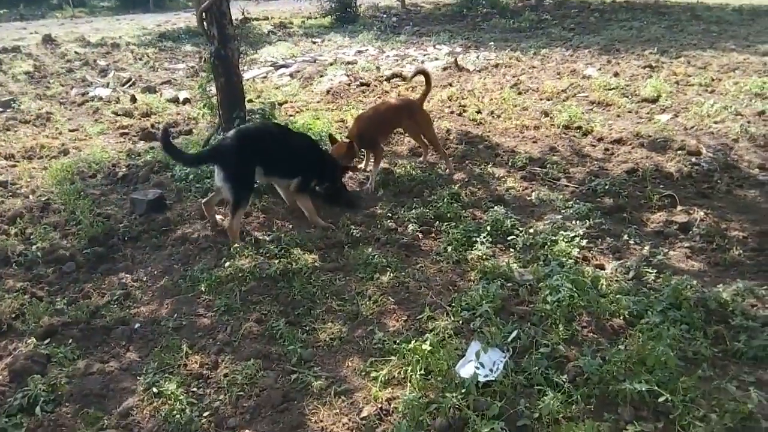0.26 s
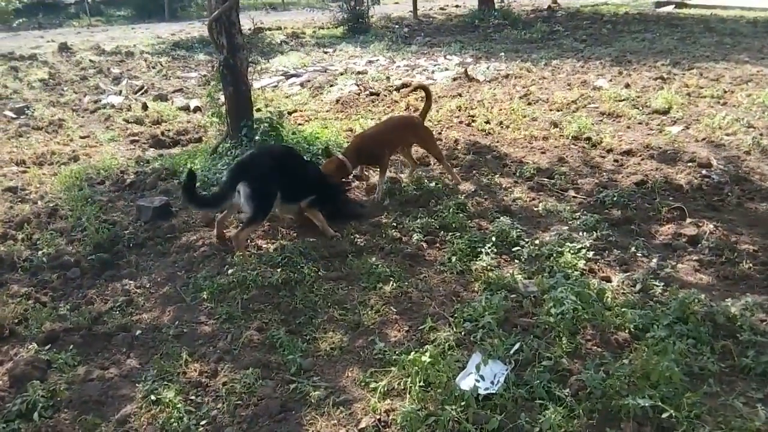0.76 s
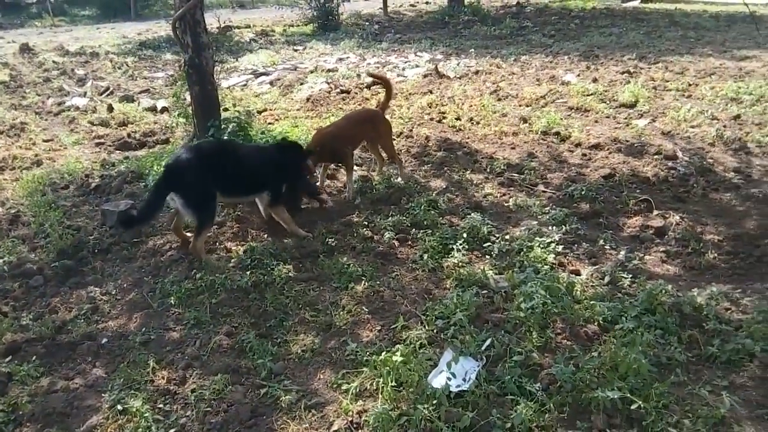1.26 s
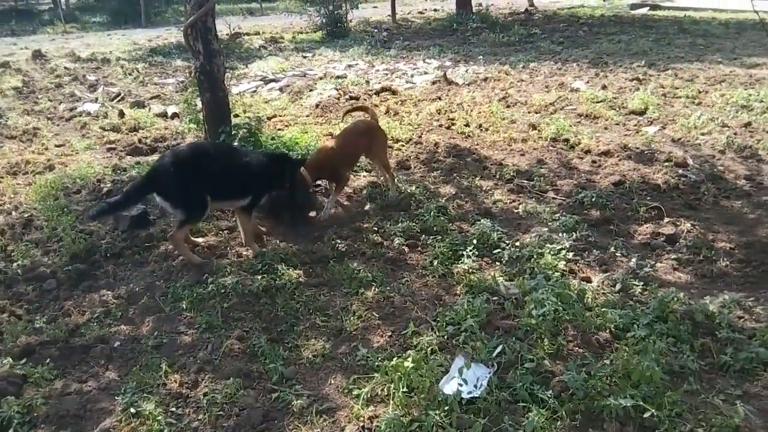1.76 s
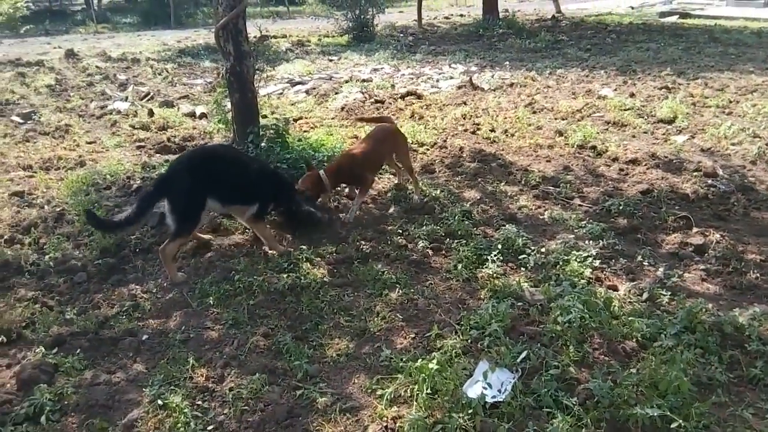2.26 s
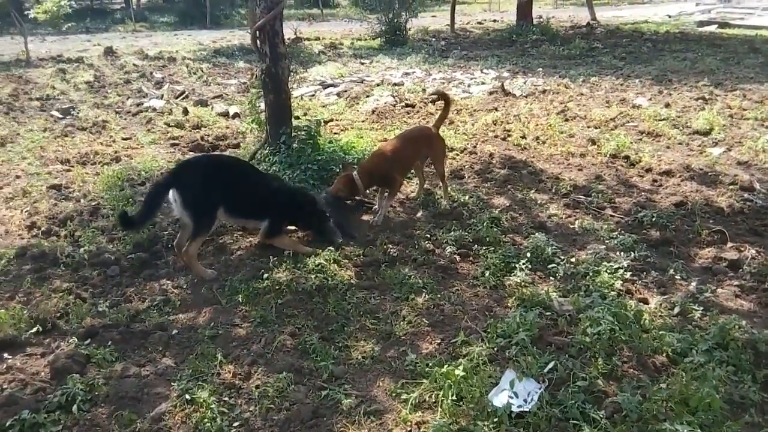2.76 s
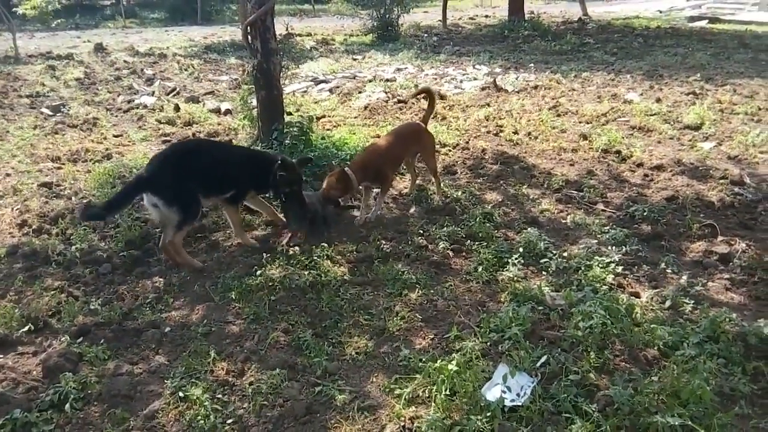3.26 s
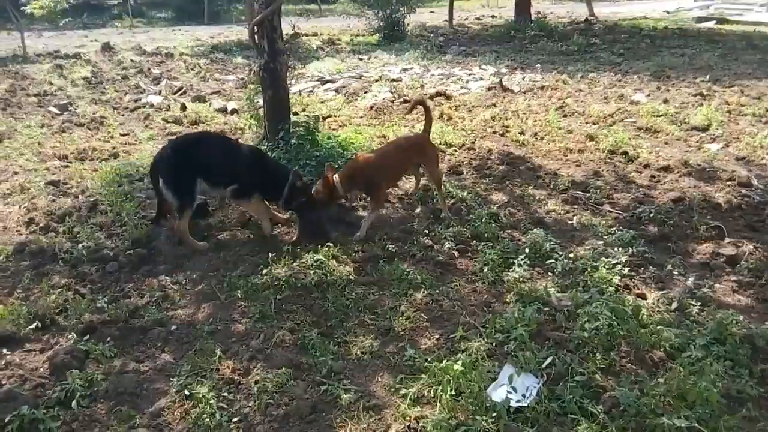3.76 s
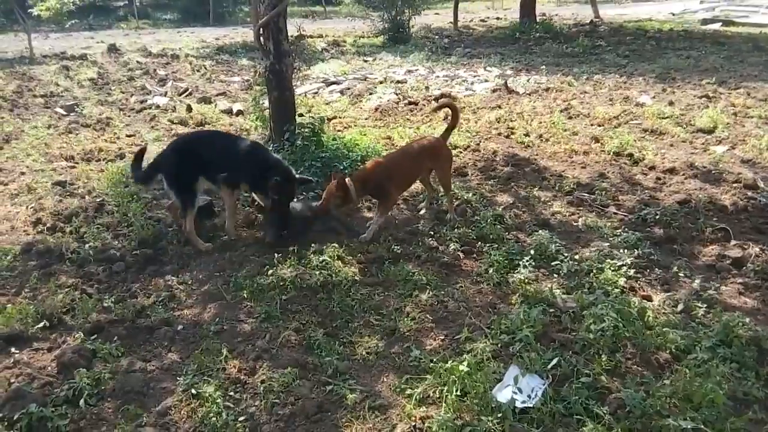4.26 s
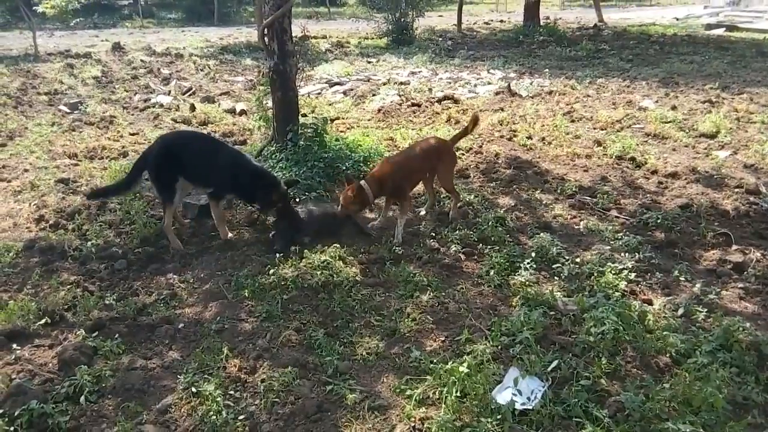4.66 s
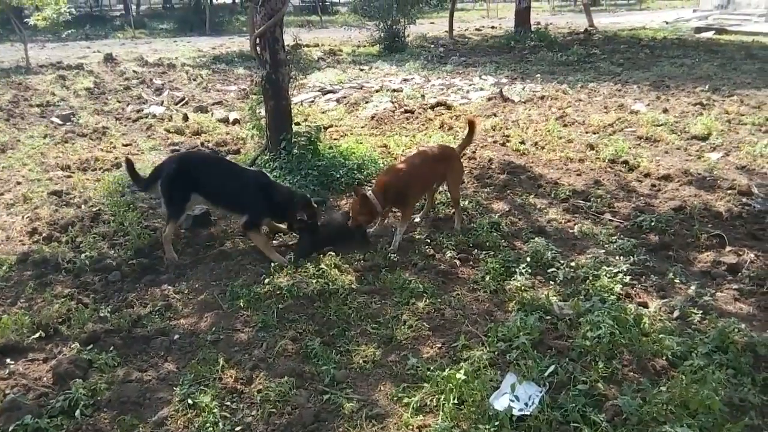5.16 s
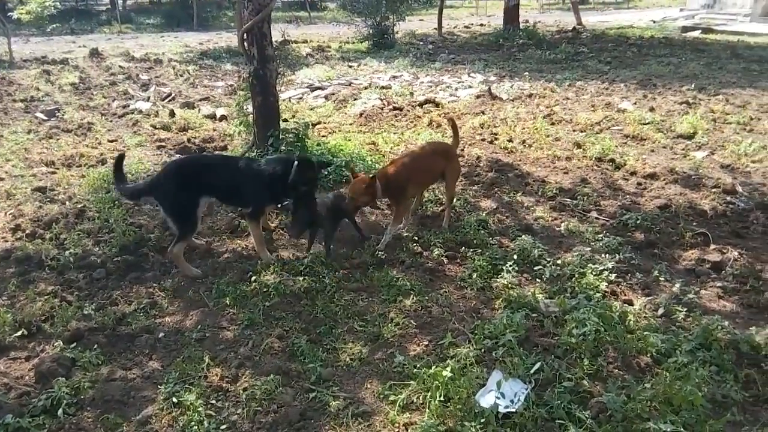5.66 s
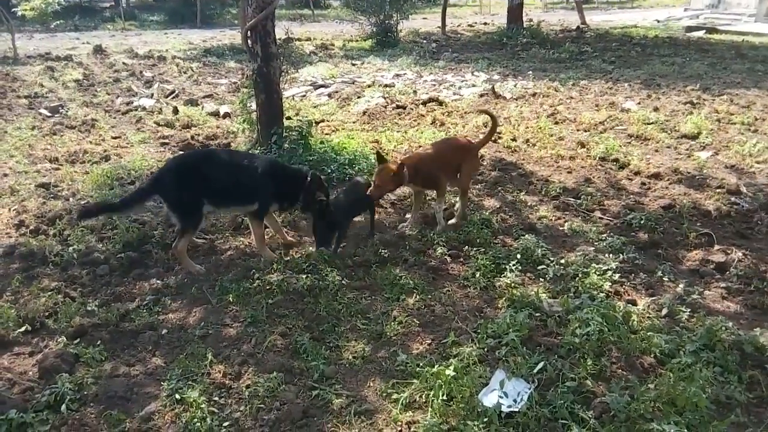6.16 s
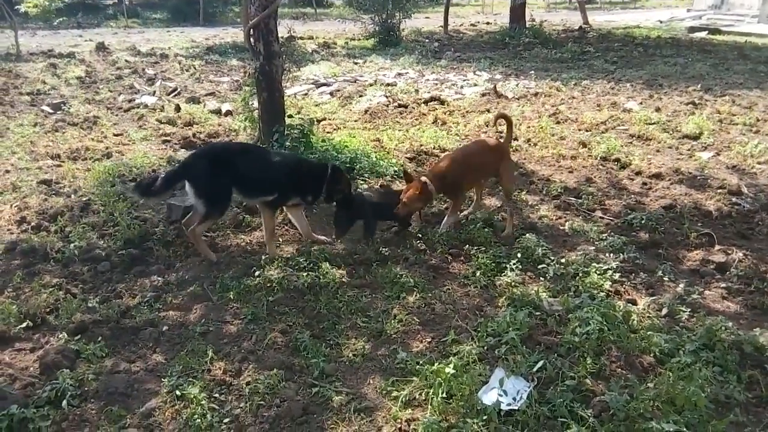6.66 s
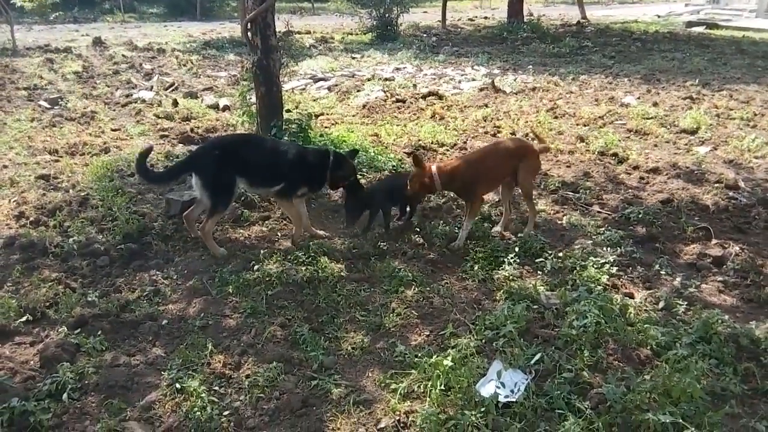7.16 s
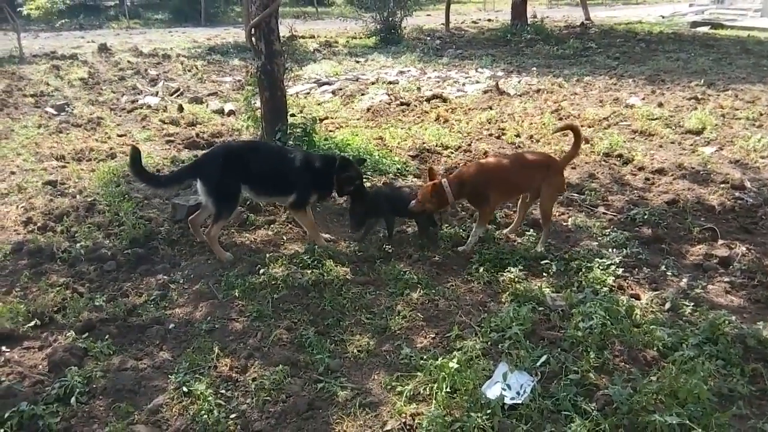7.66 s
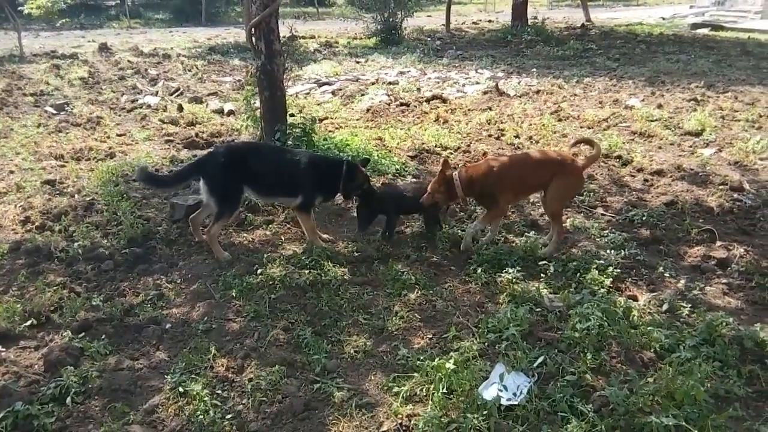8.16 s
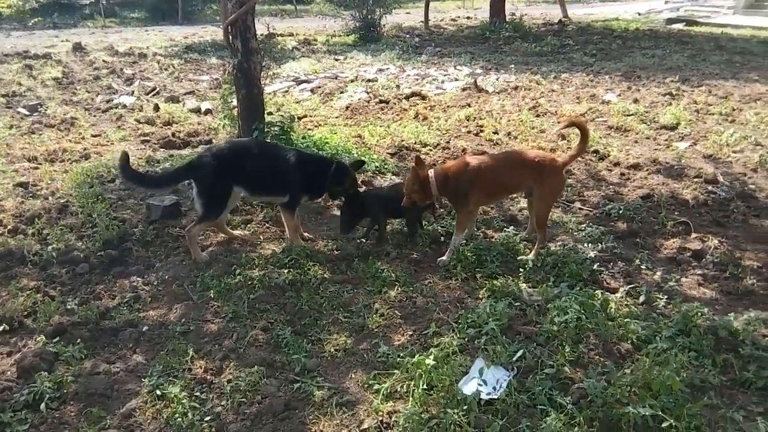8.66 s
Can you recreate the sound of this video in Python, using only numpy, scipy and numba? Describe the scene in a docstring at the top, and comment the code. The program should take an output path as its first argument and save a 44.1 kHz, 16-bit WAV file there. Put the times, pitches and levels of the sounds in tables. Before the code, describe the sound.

Quiet outdoor air with a barely audible low motor hum lies under a piglet screaming a few metres from a phone. The end of a squeal drops away at 0-0.1 s. A low croak rattles at 0.6, a faint leaf snap comes near 0.9, then a short squeal at 1.0-1.1 over soft soil thuds. The longest, loudest scream runs 1.45-2.6, nasal and whistling, breaking between clear and hoarse and jumping up in pitch. Another long one, 3.0-3.9, starts rough, leaps higher, then sinks; a leaf snaps sharply inside it near 3.45. Shorter cries follow: 4.35-4.7 with a croak inside, 5.2-5.85 growing out of a croak, a quick one at 6.3-6.5, and a weaker one at 7.0-7.5 after a croak. Faint leaf crackles come near 7.8, croaks at 8.05 and 8.6, and a last short squeal at 8.65-8.85. Each ends abruptly with a thin, dull echo.

```python
"""A piglet held by two dogs screams on open ground under trees, a few metres from a phone.
Over a quiet outdoor background and motor hum, the end of one cry drops away; then come eight more, made by
tone and hiss of the folds in moving resonances: squeals that flip between clear and hoarse and fall in pitch.
Before or in many of them slack folds croak, as rows of slaps that ring the airway. From just before the
second cry, paws now and then snap dry leaves; soft thuds on soil, as low decaying sines, lie under that cry."""
import sys
import numpy as np
from scipy import signal
from scipy.fft import rfft, irfft, next_fast_len
from scipy.io import wavfile
from scipy.ndimage import uniform_filter1d
from numba import njit

SR = 44100
rng = np.random.default_rng(int(sys.argv[2]) if len(sys.argv) > 2 else 0)


def file_out(sig):
    """Save sig as 16-bit WAV at sys.argv[1]."""
    # one column per channel
    cols = np.atleast_2d(sig).T
    # limit, then scale
    lim = np.clip(cols, -1, 1)
    pcm = np.round(lim * 32767).astype(np.int16)
    wavfile.write(sys.argv[1], SR, pcm)


N = 392490
TIME = np.arange(N) / SR


def undb(db):
    """Decibels to gain."""
    return 10 ** (np.asarray(db) / 20)


def unit(x):
    """Scale to rms 1."""
    return x / np.sqrt(np.mean(x ** 2))


def steady(x, span_s):
    """Hold the short-term rms near 1; faster flutter stays."""
    size = max(int(span_s * SR), 8)
    power = uniform_filter1d(uniform_filter1d(x * x, size), size)
    return x / np.sqrt(np.abs(power) + 1e-12)


def colour(x, points):
    """Filter by a (Hz, dB) outline, joined on a logarithmic frequency scale."""
    hz, db = np.transpose(points)
    size = next_fast_len(N, real=True)
    bins_hz = np.maximum(np.arange(size // 2 + 1) * SR / size, 1)
    gain = undb(np.interp(np.log(bins_hz), np.log(hz), db))
    return irfft(rfft(x, size) * gain, size)[:N]


def wobble(rate):
    """Random motion of rms 1, gliding between `rate` chance values per second."""
    knots = rng.standard_normal(int(N / SR * rate) + 2)
    return unit(np.interp(TIME * rate, np.arange(len(knots)), knots))


def turn(hz):
    """Running phase in radians of a changing frequency."""
    return 2 * np.pi * np.cumsum(hz) / SR


def add(out, s, sound):
    """Mix a short sound in at time s."""
    i = max(int(s * SR), 0)
    out[i:i + len(sound)] += sound[:N - i]


def along(t, curve):
    """Read each column of an (s, ..) curve at the times t."""
    s, *columns = np.transpose(curve)
    return [np.interp(t, s, c) for c in columns]


# Colour of the outdoor air. Each row: frequency in Hz, relative density in dB per Hz.
AIR_COLOUR = [(25, -15), (60, -0.5), (115, 5), (200, -3.5), (400, -7), (520, 3.5), (640, -6), (850, -3),
              (1400, -6), (2800, -10), (4200, -9), (6500, -12.5), (10000, -26), (15500, -16.5)]


def outdoors(air_db=-53, hum_hz=122, hum_db=-67):
    """Coloured noise swells very faintly; a distant motor hum is one sine of unsteady pitch and level."""
    air = unit(colour(rng.standard_normal(N), AIR_COLOUR)) * undb(air_db + 0.23 * wobble(1.0))
    hum = np.sin(turn(hum_hz * (1 + 0.02005 * wobble(9.5))))
    return air + hum * undb(hum_db + 2.8 * wobble(8.4))


SCOOP_S = .035  # time constant of the upward scoop in pitch
# on letting go the folds slacken and the pitch drops
FALL_HZ_PER_S, LOWEST_HZ, SLACKEN_S = 2600, 149.54, .022
RELEASE_DB_PER_S = 446  # a cry dies away after the last point of its airway curve
JAW_CLOSES = .9  # the main resonance sinks by this share of the relative pitch fall
USUAL_ROUGH, USUAL_SNOUT_DB = 0.37, -28.5  # where the throat, mouth and lip levels of a cry apply
THROAT_ROUGH_DB, MOUTH_ROUGH_DB = 9, 8.5  # rise per unit of roughness
THROAT_SLACK_DB = 7.5  # rise in the throat with fully slack folds
MOUTH_FOLLOWS, LIPS_FOLLOW = 0.62, 0.89  # dB per dB of the snout


def cry(t, row, fold_curve, airway_curve):
    """Controls of one cry: the pitch scoops, is held, then drops as the folds let go, and the airway dies away."""
    (start, attack, lets_go, scoop_hz, fall_rough, skirt_db, mouth_db,
     throat_start, throat_end, lips_start, lips_end) = row
    held_hz, rough = along(t, fold_curve)
    main, snout, jaw_hz = along(t, airway_curve)
    throat, lips = along(t, [(start, throat_start, lips_start), (lets_go, throat_end, lips_end)])
    age = t - start
    falling = np.maximum(t - lets_go, 0)
    dying = np.maximum(t - airway_curve[-1][0], 0)
    slack = np.minimum(falling / SLACKEN_S, 1)

    scooped_hz = held_hz - scoop_hz * np.exp(-age / SCOOP_S)
    hz = np.maximum(scooped_hz - FALL_HZ_PER_S * falling, LOWEST_HZ)
    jaw_hz = jaw_hz * np.maximum(1 - JAW_CLOSES * FALL_HZ_PER_S * dying / held_hz, .5)
    rough = np.clip(rough + slack * (fall_rough - rough), 0, 1)

    # hoarse or slack folds feed the throat, rasp fills the mouth
    rasp = rough - USUAL_ROUGH
    brightness = snout - USUAL_SNOUT_DB
    throat = throat + THROAT_ROUGH_DB * rasp + THROAT_SLACK_DB * slack
    mouth = mouth_db + MOUTH_FOLLOWS * brightness + MOUTH_ROUGH_DB * rasp
    lips = lips + LIPS_FOLLOW * brightness
    sounding = np.minimum(age / attack, 1) * undb(-RELEASE_DB_PER_S * dying)
    return np.array([hz, rough, jaw_hz, sounding, main, main + skirt_db, throat, mouth, snout, lips])


def folds(hz, rough, jitter=0.0198, waver=0.01302, tear=0.73, high_tear=1.9, bend_hz=110, patchy_db=9.0,
          gating=.7, side=0.37, side_ratio=0.25, chaos=2.09, air=0.0097, count=15):
    """Tone and noise of the folds; under strain the harmonics waver, tear apart and drown in turbulence."""
    drift = rough * (jitter * wobble(300) + waver * wobble(36)) + 0.002094 * wobble(60)
    phase = turn(hz * (1 + drift))
    tone = 0
    for k in range(1, count + 1):
        # each harmonic swells, slips and bends on its own, the high ones most
        height = 2 * k / count
        swell = undb(patchy_db * np.sqrt(rough) * height * np.tanh(wobble(30)))
        bend = turn(bend_hz * rough * height ** 2 * wobble(22))
        slip = tear * rough * (1 + high_tear * height ** 2) * wobble(110)
        tone = tone + swell * np.cos(k * phase + bend + slip)
    # a second, slower oscillation of the larynx puts sidebands between the harmonics
    flap = np.cos(turn(side_ratio * hz * (1 + 0.18 * wobble(14))))
    tone = unit(tone * (1 + 2 * side * rough * flap))
    # the air rushes in step with the folds
    turbulence = unit(rng.standard_normal(N) * (1 + gating * np.cos(phase)))
    # the highest part of the voice always has hiss
    hiss = colour(turbulence, [(4000, -37.0), (6300, -19), (8000, 0.5)])
    noise = (air + chaos * rough ** 1.34) * turbulence + hiss
    return (1 - rough ** 2) * tone, noise


@njit
def resonate(x, hz, width):
    """State-variable band-pass with a moving centre and width, both in Hz."""
    y, band, low = np.empty(len(x)), 0., 0.
    for i in range(len(x)):
        g, k = np.tan(np.pi * hz[i] / SR), width[i] / hz[i]
        v = (band + g * (x[i] - low)) / (1 + g * (g + k))
        band, low, y[i] = 2 * v - band, low + 2 * g * v, k * v
    return y


# The cries. Each row: start in s, attack in s, moment of letting go in s, upward scoop in Hz,
# roughness of the final fall from 0 to 1, skirt relative to the untrimmed main resonance in dB, mouth in dB,
# throat at the start in dB, throat on letting go in dB, lips at the start in dB, lips on letting go in dB.
# Throat, mouth and lip levels shift with roughness, slackness and the snout.
CRIES = [(-.05, .01, 0.068, -1, 0.21, -10, -37.5, -58, -45, -49, -44),
         (1.025, .018, 1.12, 70, .35, -6.5, -34.5, -35, -48, -42, -38),
         (1.443, .01, 2.59, 130, 0.31, -16.5, -35.5, -48.5, -48.5, -35.5, -34),
         (3.033, .01, 3.875, 20, 0.57, -9.5, -34.5, -46.5, -50, -40.5, -48.5),
         (4.335, 0.0039, 4.69, 0, 0.41, -6.5, -35.5, -30.5, -47, -30, -39.5),
         (5.2, 0.062, 5.825, -0.5, 0.4, -10, -33, -32, -47.5, -26, -41.5),
         (6.28, .03, 6.45, 79.5, .55, -8.5, -32, -47, -46.5, -42, -38.5),
         (7.035, .02, 7.53, 100.5, 0.75, -8, -30.5, -53, -48.5, -31, -38),
         (8.645, 0.0086, 8.84, 48.5, 0.67, -9, -32, -41, -50.5, -25, -34.5)]
# Vocal folds, one curve per cry until it lets go. Each row: time in s, held pitch in Hz before scoop and
# jitter, roughness from 0 to 1.
FOLD_CURVES = [
    [(0, 368, 0.28), (.055, 309.5, 0.5)],
    [(1.03, 369, .7), (1.07, 383.4, 0.26), (1.095, 372.5, 0.19), (1.125, 345, 0.23)],
    [(1.45, 463, 0.63), (1.66, 477.7, 0.51), (1.77, 461.5, 0.56), (1.82, 451, 0.71), (1.88, 443, .5),
     (1.884, 529, 0.42), (1.98, 510, .3), (2.02, 533, .1), (2.06, 518, 0.45), (2.12, 511, .37),
     (2.3, 447, 0.77), (2.34, 494.4, 0.51), (2.39, 511, 0.21), (2.47, 507, 0.21), (2.58, 468.7, 0.58)],
    [(3.04, 414.4, 0.83), (3.09, 420.6, 0.72), (3.13, 440.7, 0.46), (3.28, 474.7, 0.36), (3.378, 473, 0.51),
     (3.382, 577, 0.56), (3.45, 560.3, 0.5), (3.53, 555.5, 0.39), (3.56, 544.3, 0.09), (3.66, 530, 0.17),
     (3.7, 541, 0.59), (3.74, 516.7, 0.18), (3.8, 508.4, 0.19), (3.875, 487.4, 0.37)],
    [(4.34, 458, 0.18), (4.41, 417.6, 0.93), (4.48, 484, 0.14), (4.53, 514.5, 0.29), (4.625, 528, 0.48),
     (4.65, 491, 0.14), (4.7, 484.7, 0.09)],
    [(5.21, 417.3, .35), (5.3, 429.4, 0.76), (5.33, 475, 0.36), (5.38, 493, .12), (5.46, 468, 0.5),
     (5.505, 487.7, .1), (5.54, 463.5, 0.23), (5.65, 547, 0.34), (5.77, 565, 0.3), (5.82, 508, 0.53)],
    [(6.29, 496.7, 1), (6.325, 496, 0.25), (6.345, 538, .6), (6.41, 509, 0.27), (6.435, 480.6, 0.06),
     (6.48, 457.2, 0.11)],
    [(7.04, 501, 0.7), (7.085, 533, 0.3), (7.13, 542, 0.24), (7.175, 434.6, .2), (7.22, 467, 0.57),
     (7.275, 426, 0.05), (7.36, 486, 0.64), (7.45, 486.7, 0.21), (7.51, 471, 0.36)],
    [(8.645, 485.6, 0.44), (8.74, 524, 0.38), (8.77, 497, 0.7)],
]
# Airway, one curve per cry. Each row: time in s, main resonance in dB before its trim, snout resonance in dB,
# main resonance set by the jaw in Hz before the voice pulls it.
AIRWAY_CURVES = [
    [(0.0, -30.5, -22, 2150), (0.04, -32.5, -32, 1850), (0.08, -45.5, -52, 1700)],
    [(1.03, -43, -62, 2170), (1.046, -32, -43, 2140), (1.08, -36, -30, 2120), (1.12, -23, -36, 2130),
     (1.155, -37, -49.5, 1630)],
    [(1.45, -35, -57, 1640), (1.482, -24.5, -30, 1750), (1.562, -23.5, -26, 2260),
     (1.582, -19.5, -22.5, 2292), (1.662, -24, -29.5, 2269), (1.766, -16.5, -26, 2296),
     (1.856, -23, -38.5, 2260), (1.912, -18.5, -25.5, 2130), (1.936, -17.5, -30.5, 2130),
     (2.118, -17.5, -29.5, 2120), (2.176, -27.5, -24.5, 1970), (2.26, -20.5, -22.5, 2330),
     (2.366, -31, -33, 2059), (2.398, -15, -31, 2040), (2.502, -19.5, -23.5, 1993),
     (2.58, -32.5, -23.5, 2015), (2.61, -26.5, -26, 1846)],
    [(3.04, -34, -41, 2123), (3.058, -33, -43.5, 2160), (3.104, -28.5, -36, 2200),
     (3.134, -29.5, -29, 1804), (3.212, -18, -23, 1822), (3.256, -28.5, -29.5, 1852),
     (3.346, -25, -35, 2401), (3.422, -20.5, -21, 2047), (3.494, -21, -20.5, 1830),
     (3.674, -20.5, -18, 2050), (3.77, -18, -20.5, 2010), (3.808, -21.5, -17.5, 1700),
     (3.832, -24.5, -20.5, 1562), (3.888, -24.5, -23.5, 1629), (3.9, -21.5, -26, 1646)],
    [(4.34, -35.5, -61, 2247), (4.46, -33.5, -28, 2225), (4.496, -38, -27.5, 1817), (4.608, -34, -45, 2140),
     (4.646, -25.5, -21.5, 1980), (4.682, -30.5, -17.5, 1917), (4.702, -36.5, -24.5, 1734),
     (4.722, -28.5, -26, 1912), (4.735, -34.5, -41.5, 2034)],
    [(5.21, -74, -83, 2070), (5.246, -70, -73, 2192), (5.29, -36.5, -53, 2027), (5.346, -31, -30.5, 2085),
     (5.4, -33.5, -33.5, 1870), (5.502, -25.5, -30, 2344), (5.536, -22.5, -24.5, 2307),
     (5.692, -26.5, -44.5, 2160), (5.73, -45.5, -59.5, 2225), (5.788, -24.5, -32, 1809),
     (5.845, -29, -32.5, 1670)],
    [(6.275, -38.5, -38, 1650), (6.427, -23.5, -27.5, 2390), (6.441, -25.5, -25.5, 2370),
     (6.481, -21, -22, 2305), (6.51, -32.5, -37, 2180)],
    [(7.045, -37, -52, 2243), (7.075, -39, -44, 1948), (7.181, -29.5, -36.5, 2183), (7.199, -37, -46, 2140),
     (7.283, -28.5, -35.5, 2220), (7.401, -33.5, -32.5, 2026), (7.429, -37.5, -27, 2326),
     (7.533, -29.5, -26.5, 2380), (7.555, -39, -43, 2390)],
    [(8.65, -34.5, -56, 2160), (8.69, -54, -57, 2210), (8.776, -31.5, -34.5, 2318), (8.8, -47, -52, 2232)],
]
# Fixed resonances of throat, mouth and snout, and the hiss at the lips.
# Each row: frequency in Hz, relative level in dB.
THROAT_SHAPE = [(190, -32), (300, -15), (420, -24), (560, -12), (720, -4), (880, 0), (1100, -6),
                (1300, -16), (1800, -60)]
MOUTH_SHAPE = [(2200, -75), (2750, 15.5), (3300, 17), (3600, 15), (4100, -105.5)]
SNOUT_SHAPE = [(3200, -75), (3700, -3.5), (4050, 10), (4400, -3.5), (4700, -7), (5200, -36.5)]
LIPS_SHAPE = [(4300, -49), (4800, 11), (5500, 9), (6600, 4.5), (7500, -8.5), (10000, -15), (15500, -17)]


def squeals(clear_width_hz=320, hoarse_width_hz=600, lock=0.057, main_trim_db=-1, grit_db=2, upper_tone=0.83):
    """The folds drive the airway; its main resonance moves with the jaw and lifts one harmonic to a whistle."""
    # each cry owns the time until the next one starts
    spans = np.split(TIME, np.searchsorted(TIME, [row[0] for row in CRIES[1:]]))
    controls = [cry(*each) for each in zip(spans, CRIES, FOLD_CURVES, AIRWAY_CURVES)]
    (hz, rough, jaw_hz, sounding, main_db, skirt_db,
     throat_db, mouth_db, snout_db, lips_db) = np.hstack(controls)
    tone, noise = folds(hz, rough)
    source = tone + noise
    # the whistle stays clearer than the rest of the voice
    whistle = tone + noise / 3
    # a harmonic near the resonance pulls it in; halfway between two, both sound
    centre_hz = jaw_hz - lock * hz * np.sin(2 * np.pi * jaw_hz / hz) / (2 * np.pi)
    # folds that no longer close damp the resonance
    width_hz = clear_width_hz + hoarse_width_hz * rough ** 2
    narrowed = resonate(whistle, centre_hz, width_hz)
    main = steady(resonate(narrowed, centre_hz, width_hz), 0.027)
    # a skirt below the main resonance lifts a second, lower harmonic
    skirt_shape = [(950, -13), (1300, 15), (1600, 23), (1800, 17), (2500, -56.0), (3100, -25.0)]
    skirt = steady(colour(source, skirt_shape), 0.028)
    voice = undb(main_db + main_trim_db) * main + undb(skirt_db) * skirt
    # mouth and lips get less tone for the same noise, so they sound hoarser
    breathy = upper_tone * tone + noise
    for drive, shape, db in ((source, THROAT_SHAPE, throat_db), (breathy, MOUTH_SHAPE, mouth_db),
                             (source, SNOUT_SHAPE, snout_db), (breathy, LIPS_SHAPE, lips_db)):
        voice += undb(db) * steady(colour(drive, shape), 0.05)
    # hoarse stretches come in uneven bursts
    grit = undb(grit_db * rough ** 2 * np.tanh(wobble(170)))
    return voice * sounding * grit


# The croaks. Each row: first slap in s, last slap in s, average slaps per s before rounding to whole slaps,
# bunching towards the end from 0 to 1, loudest moment in s, level there in dB before the croak trim.
CROAKS = [(.569, 0.697, 63, 0.28, .625, -17.5), (4.367, 4.417, 61, 0, 4.4, -19.5),
          (5.236, 5.284, 87, 0.17, 5.265, -21.5), (6.217, 6.269, 56, 0, 6.246, -22.5),
          (6.922, 7.03, 55, .1, 6.982, -17.5), (8.019, 8.115, 48, 0, 8.032, -19),
          (8.543, 8.636, 55, 0.12, 8.584, -20.5)]


def slaps(swell_s=0.058, swell_db=10, scatter_db=1):
    """(s, dB) of every slap: within a croak they swell and fade, and mostly speed up."""
    out = []
    for first, last, rate, bunch, loudest, db in CROAKS:
        part = np.linspace(0, 1, round((last - first) * rate) + 1)
        s = first + (last - first) * (part + bunch * part * (1 - part))
        # swell_s away from its loudest moment a croak is swell_db weaker
        weaker_db = swell_db * (np.abs(s - loudest) / swell_s) ** 1.58
        out += zip(s, db - weaker_db + scatter_db * rng.standard_normal(len(s)))
    return out


# What a slap rings in the airway. Each row: frequency in Hz before a chance shift, time to fall 60 dB in s,
# relative level in dB before hardness and the croak colour.
CROAK_MODES = [(285.7, 0.0075, -42), (931, 0.032, -5), (1550, 0.026, -20), (2340, 0.021, 0.5),
               (3240, 0.0042, 8.5), (3845, 0.024, -0.5), (5500, 0.0078, 0)]


def croaks(trim_db=-14, puff=0.079, puff_s=0.0018, hard_db=-17, brightening=0.46):
    """Slack folds slap some fifty to ninety times a second; slap and puff ring the airway, hard ones brighter."""
    out, t = np.zeros(N), TIME[:SR // 50]
    for s, db in slaps():
        push = puff * rng.standard_normal(len(t)) * np.exp(-(t / puff_s) ** 2)
        push[0] += .3  # the slap itself
        ring = 0
        for hz, t60, mode_db in CROAK_MODES:
            shifted_hz = hz * (1 + 0.022 * rng.standard_normal())
            mode = np.cos(2 * np.pi * shifted_hz * t) * np.exp(-np.log(1000) * t / t60)
            driven = signal.fftconvolve(push, mode)[:len(t)]
            bright_db = (hz > 1800) * brightening * (db - hard_db)
            ring = ring + unit(driven) * np.std(mode) * undb(mode_db + bright_db)
        add(out, s, unit(ring) * undb(db + trim_db))
    return colour(out, [(60, -16), (170, 0), (300, 11.5), (420, -3), (800, 7.5), (4300, -2),
                        (4900, -15.5), (6200, -9), (12000, -17)])


# Paws in dry leaves. Each row: centre in s, length in s, level in dB.
SCUFFS = [(0.867, 0.0076, -42.5), (3.447, 0.006, -21), (6.158, 0.091, -48), (7.764, 0.021, -43),
          (7.804, 0.0022, -44), (7.817, 0.038, -53), (7.854, 0.011, -40.5), (7.865, 0.024, -54),
          (8.356, 0.0041, -49)]


def scuffle(idle_db=-65, grain_db=5.0):
    """Dry leaves crackle in dense tiny snaps of uneven strength, louder where the paws press."""
    pressure = undb(idle_db + 5 * wobble(12))
    for s, length, db in SCUFFS:
        pressure = pressure + undb(db) * np.exp(-2 * ((TIME - s) / length) ** 2)
    strength = undb(grain_db * np.minimum(rng.exponential(size=N), 2))
    snaps = rng.standard_normal(N) * (rng.random(N) < .08) * strength
    leaf_shape = [(300, -53), (3000, -16.0), (4600, 9), (6500, 2.5), (10000, -5), (15500, 3.0)]
    return pressure * unit(colour(snaps, leaf_shape))


# Paws on soil. Each row: start in s, level in dB before the thud trim.
THUDS = [(1.04, -46), (1.091, -44), (1.126, -60)]


def thuds(trim_db=3, decay_s=0.018):
    """The soil gives under a paw as two low sines that die away together."""
    out, t = np.zeros(N), TIME[:SR // 8]
    thud = np.exp(-t / decay_s) * (np.sin(2 * np.pi * 85 * t) + np.sin(2 * np.pi * 125 * t))
    for s, db in THUDS:
        add(out, s, undb(db + trim_db) * thud)
    return out


def trees(x, far_db=-23.5, t60=0.54, near_db=-17, near_s=0.017):
    """Rough ground scatters the sound almost at once; trunks and fences return a thin, dull tail."""
    t = TIME[:int(.7 * SR)]
    near, far = rng.standard_normal((2, len(t))) * (t > .003)
    near = near * np.exp(-t / near_s)
    far = signal.lfilter([1], [1, -.5], far) * np.exp(-np.log(1000) * t / t60)
    echo = undb(near_db) * near / np.linalg.norm(near) + undb(far_db) * far / np.linalg.norm(far)
    return x + signal.fftconvolve(x, echo)[:N]


def scene():
    """Piglet and paws among the trees, over the outdoor background."""
    background = outdoors()
    return (trees(squeals() + croaks() + scuffle() + thuds()) + background)[None]


# Treble response of the phone. Each row: frequency in Hz, gain in dB.
PHONE_RESPONSE = [(7000, 1), (7800, -9), (11000, -5.5), (13000, -24), (14200, 1), (15000, -0.5)]


def record(dry, top_hz=15800):
    """The phone hollows out the treble and cuts the top steeply."""
    hollowed = colour(dry[0], PHONE_RESPONSE)
    low_pass = signal.ellip(10, .2, 70, top_hz, fs=SR, output="sos")
    return signal.sosfilt(low_pass, hollowed)[None]


dry = scene()
out = record(dry)
file_out(out)
```